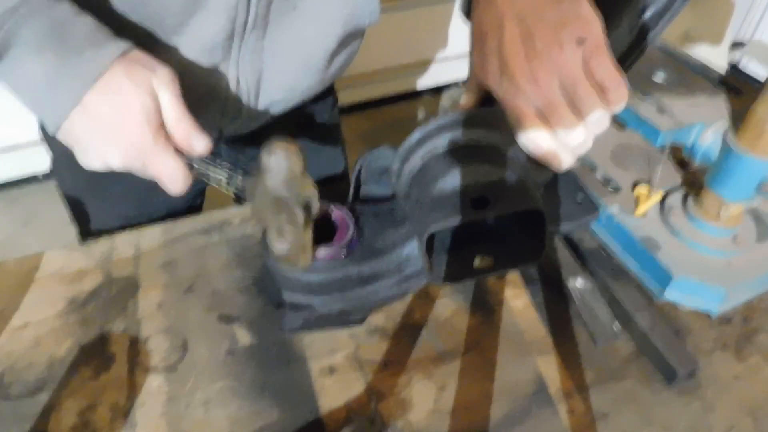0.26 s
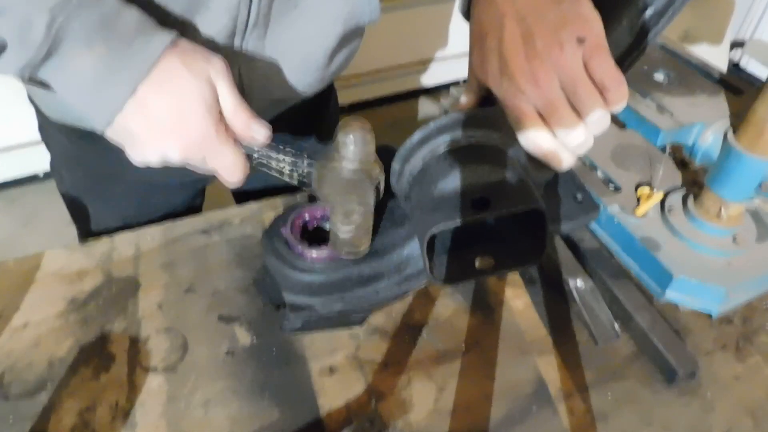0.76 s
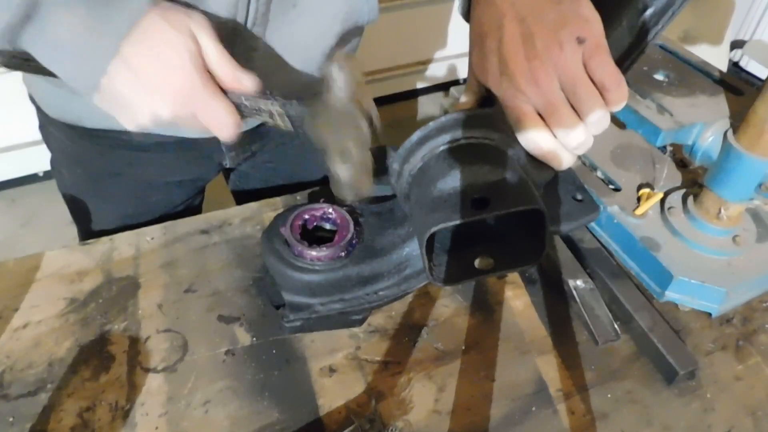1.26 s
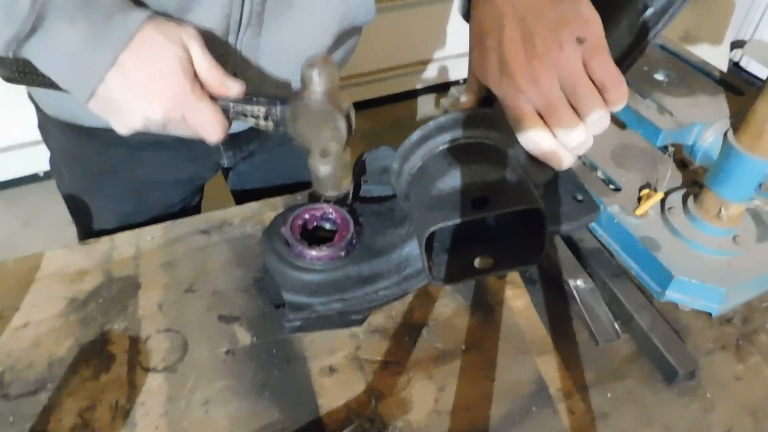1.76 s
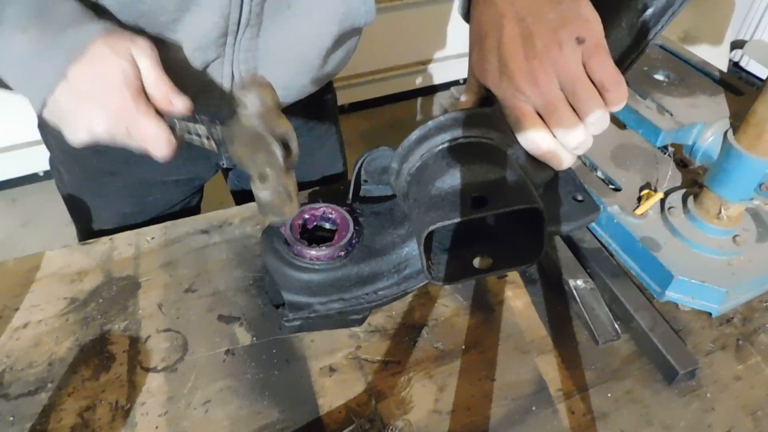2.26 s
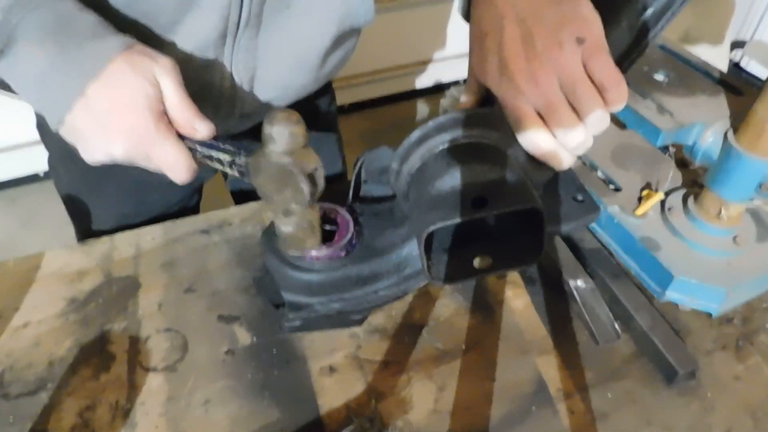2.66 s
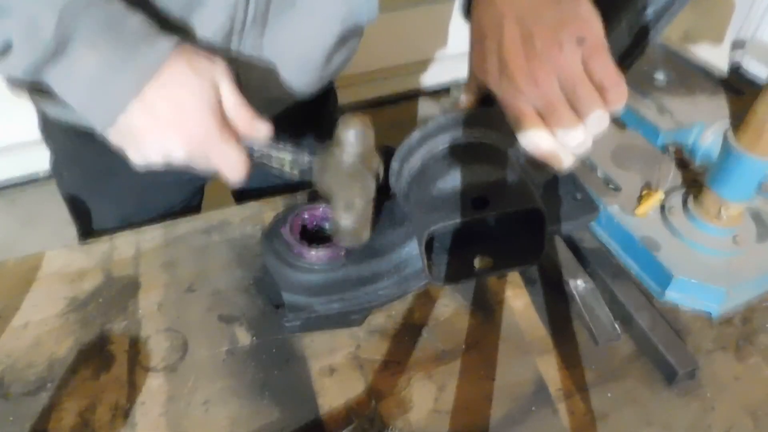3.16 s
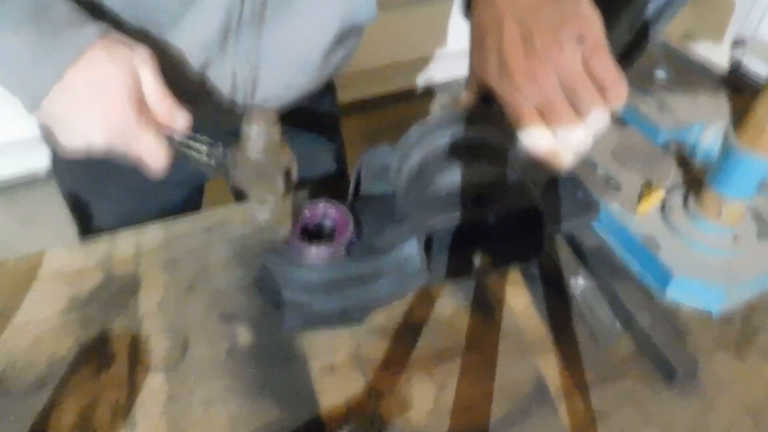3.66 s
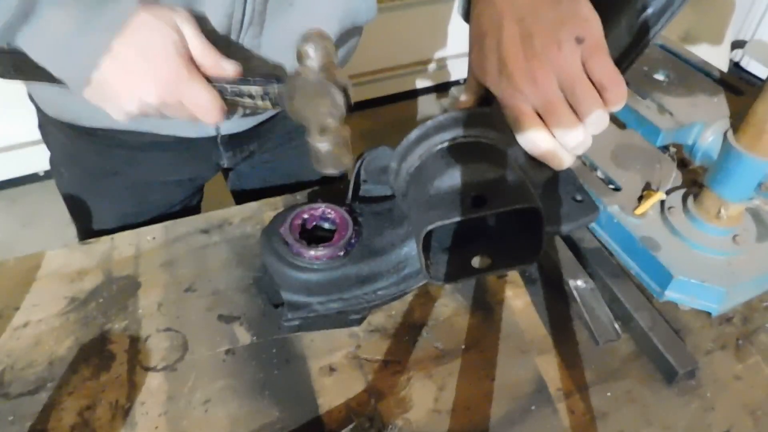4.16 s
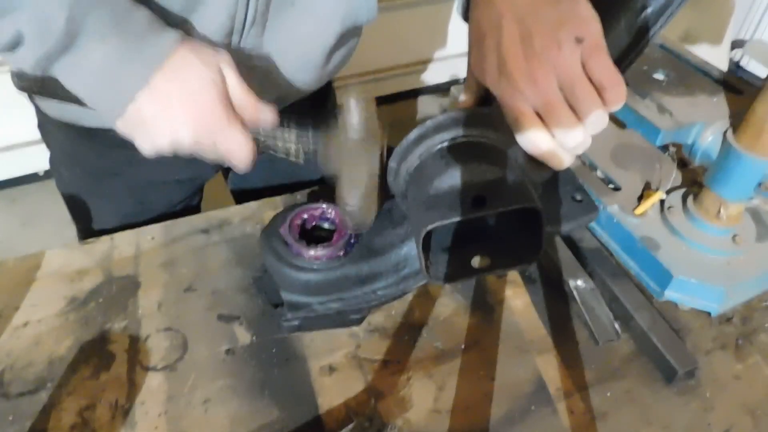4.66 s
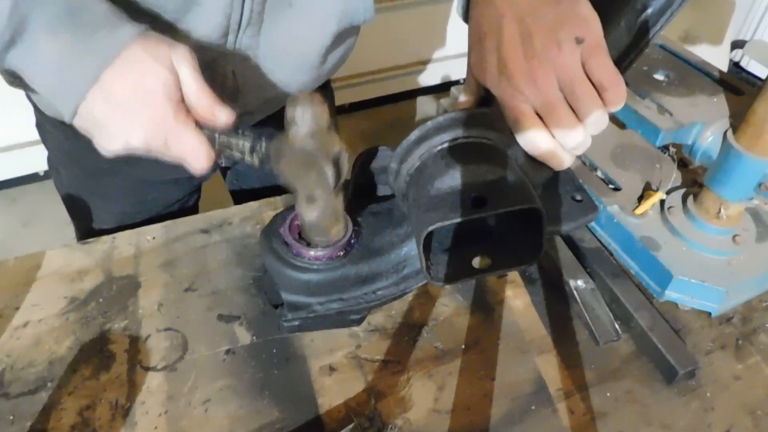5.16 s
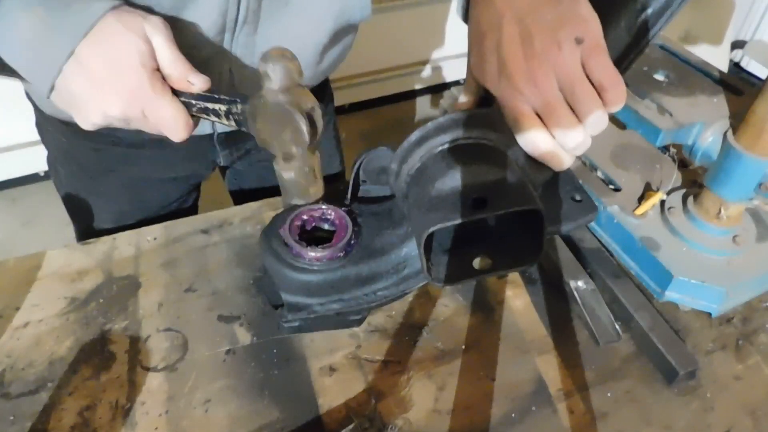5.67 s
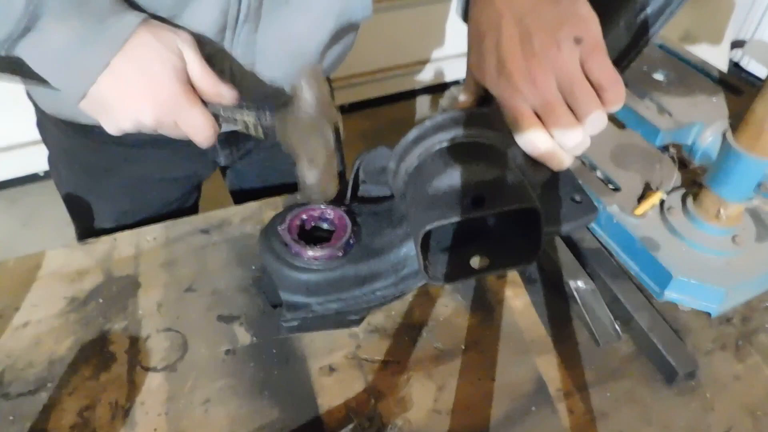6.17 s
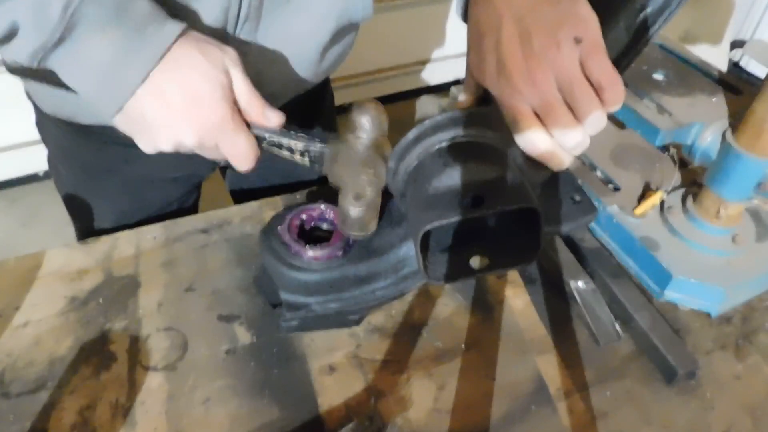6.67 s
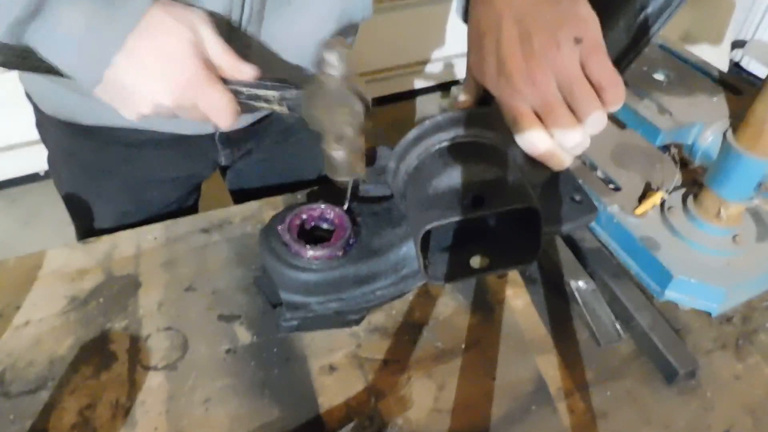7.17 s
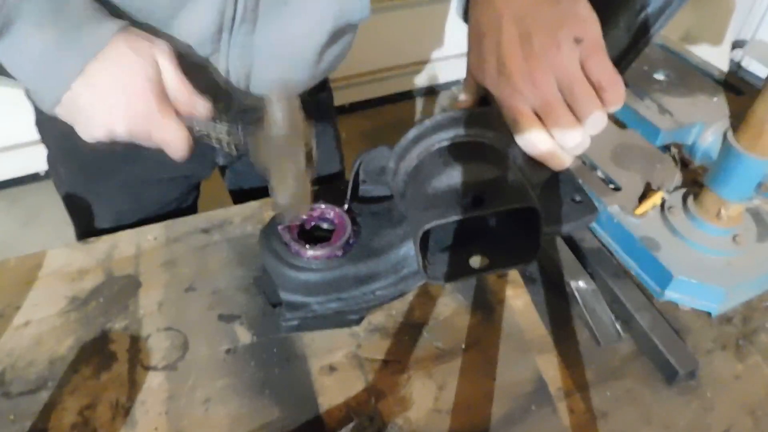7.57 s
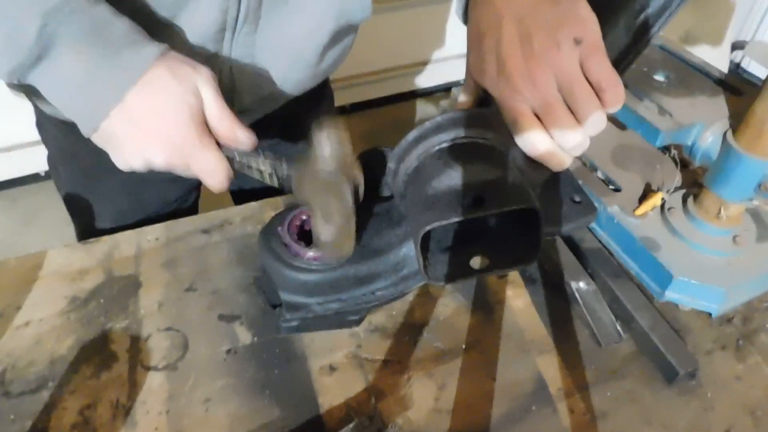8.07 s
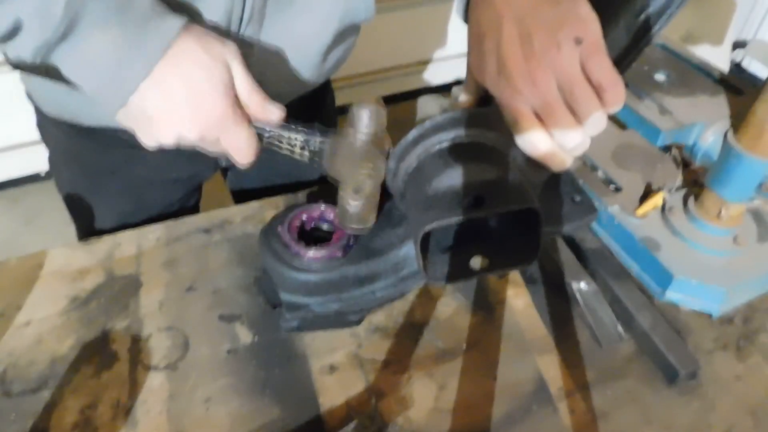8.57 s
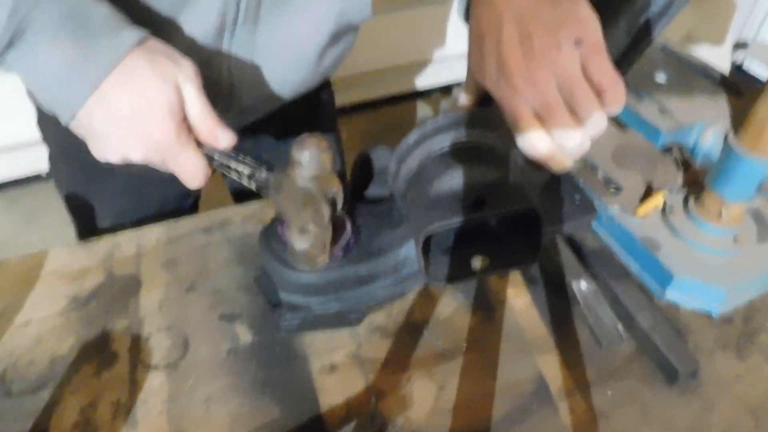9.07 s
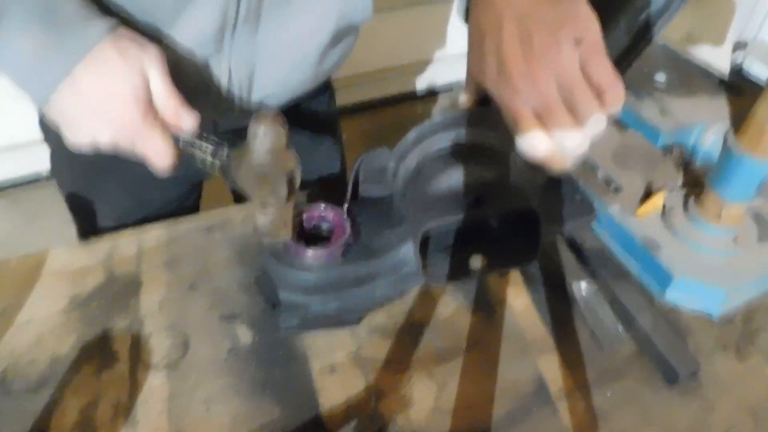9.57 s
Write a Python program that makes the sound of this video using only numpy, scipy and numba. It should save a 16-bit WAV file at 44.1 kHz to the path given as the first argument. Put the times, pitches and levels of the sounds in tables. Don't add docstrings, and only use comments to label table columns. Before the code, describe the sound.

A hammer taps a bearing into a clamped cast steel part, four or five hard blows a second in small groups with brief pauses. Early taps are duller, later ones crack sharper and firmer. Each rings the metal briefly, rattles the bench and leaves a short workshop echo. Close phone pickup, attacks slightly clipped, faint building hum.

```python
import sys
import numpy as np
from scipy import signal
from scipy.fft import rfft, irfft
from scipy.io import wavfile
from scipy.ndimage import uniform_filter1d
from numba import njit

SR = 44100
rng = np.random.default_rng(int(sys.argv[2]) if len(sys.argv) > 2 else 0)


def natural_amplitude(level_db):
    exponent = np.asarray(level_db, float) / 20
    return 10 ** exponent


def unload_audio(sound):
    columns = np.transpose(np.atleast_2d(sound))
    steps = np.round(np.clip(columns, -1, 1) * 32767)
    wavfile.write(sys.argv[1], SR, steps.astype(np.int16))


N = 433503
LEAD = SR // 2


# (time [s], place round
# the ring [steps], place across the ring [steps], long rings [dB])
HAMMER_TAPS = [(-0.17, -1, -0.61, 0.5), (0.282, -1, 0.16, 4), (0.509, -0.5, 0.53, -20.5),
               (0.7212, -0.1, 0.35, -8), (0.9309, 0.2, 0.92, -5), (1.124, 1.8, -0.66, -3),
               (1.6494, 0.45, -0.31, 2), (1.8665, -0.23, 0.26, 2.5), (2.361, -1.26, -0.9, 3),
               (2.5714, 0.7, -1.05, 2), (2.7732, -0.75, 0.11, -11.5), (3.0035, 0.1, 1, 3.5),
               (3.2058, 2.07, -0.24, 1), (3.6985, 0.1, -0.91, 8.5), (3.9429, -0.5, -0.7, 9),
               (4.3038, 0.9, -0.49, 6.5), (4.514, 1.4, -0.44, 5), (4.728, 1.5, 0.85, 7),
               (4.9523, 1.1, 0.65, 4.5),
               (5.2705, -0.25, 0.44, -3.5), (5.4877, -0.31, 0.036, -7), (5.808, -0.43, -0.47, -6.5),
                (6.026, 0.13, -1.46, 5), (6.2379, 1.16, -0.85, 6), (6.4272, 1.2, -1.4, 1),
                (6.6198, 1.95, -0.89, -10), (6.808, 2, -0.8, -8.5), (7.0104, 1.97, -1.04, 4.5),
                (7.4189, -0.1, -1.2, 3), (7.6289, 0.62, -1.2, 3.5), (7.933, -0.64, -0.23, -6),
                (8.13, 0.15, -0.68, 2.5), (8.3266, 1.7, -1.2, -3.5), (8.5214, 2.02, -1.26, 2),
                (8.8431, 0.73, 0.93, 6), (9.0432, -0.66, 0.54, 2), (9.3759, -0.29, -0.93, 2),
                (9.5704, -0.11, -1.25, 7.5), (9.778, 0.37, -1.4, 6.5)]


def taps():
    s, around, across, long_db = np.transpose(HAMMER_TAPS)

    loose_db = -9.5 * np.exp(-s / 4.3)
    reach_db = -0.72 * around ** 2 - 0.9 * across
    blow_db = 2.53 + loose_db + reach_db - 0.1 * long_db

    pause_s = 0.28
    fresh = np.diff(s, prepend=s[0]) > pause_s
    loose_crack_db = -9 * np.exp(-s / 2.44)
    edge_db = 0.84 * np.minimum(around ** 2, 4)
    crack_db = 3 + loose_crack_db + 2.1 * fresh + edge_db + 0.225 * long_db
    return np.transpose([s, blow_db, around, across, crack_db, long_db])


def lay(sounds):
    length = sounds.shape[-1]
    out = np.zeros((2, LEAD + N + length))
    for row, sound in zip(taps(), sounds):
        start = LEAD + int(row[0] * SR)
        out[:, start:start + length] += sound
    return out[:, :LEAD + N]


def colour(x, points):
    hz, db = np.transpose(points)
    bins = np.fft.rfftfreq(x.shape[-1], 1 / SR) + 1
    gain = natural_amplitude(np.interp(np.log(bins), np.log(hz), db))
    return irfft(rfft(x) * gain, x.shape[-1])


def level(x, db):
    return x * natural_amplitude(db) / np.sqrt(np.mean(x ** 2))


def fade(s, t60):
    return np.exp(-np.log(1000) * s / t60)


def ports(one, other, lag_s, apart, pan_db):
    bins = np.fft.rfftfreq(one.shape[-1], 1 / SR)
    late = irfft(rfft(one) * np.exp(-2j * np.pi * bins * lag_s), one.shape[-1])
    left = (late + apart * other) / np.hypot(1, apart)
    return np.stack([left * natural_amplitude(pan_db / 2), one * natural_amplitude(-pan_db / 2)], axis=1)


def ring(modes, blow_db, start, scatter_db, wobble, rise_s, lag_s, pan_db,
         back=0., back_s=.1, back_rise_s=0.0055):
    hz, db, t60, round_db, across_db = np.transpose(modes)
    around, across = np.clip(taps().T[2:4, :, None], -2.5, 2.5)

    s = np.arange(SR // 2) / SR
    rings = np.exp(2j * np.pi * hz[:, None] * s) * fade(s, t60[:, None])
    rings = rings * (1 - np.exp(-s / rise_s))
    rings = rings * (1 - back / (1 + np.exp((back_s - s) / back_rise_s)))

    chance = rng.standard_normal((len(taps()), 2, len(hz)))
    place_db = around * round_db + across * across_db
    gain = natural_amplitude(db + blow_db + place_db + scatter_db * chance[:, 0])
    gain = gain * np.exp(1j * (start + wobble * chance[:, 1]))

    left_gain = gain * np.exp(-2j * np.pi * hz * lag_s) * natural_amplitude(pan_db / 2)
    left = (left_gain @ rings).imag
    right = (gain @ rings).imag * natural_amplitude(-pan_db / 2)
    return lay(np.stack([left, right], axis=1))


# (frequency [Hz], level [dB], t60 [s], per step round
# [dB], per step across [dB])
CLAMPED_PART_MODES = [(109.4, -2, 0.051, 0, 1), (169, -2.5, 0.043, -0.6, 2.2), (301.7, -9, 0.1, 0, 2.5),
                      (489.5, -9.5, 0.13, 1, 3), (552.2, -4.5, 0.045, -7.5, 0.5), (657, 1.5, 0.032, 2, 1),
                      (772, 6.5, 0.034, -3, 0.5), (909, -5.5, 0.043, -5.5, 4), (1038, 1, 0.055, -5.5, 8),
                      (1087.2, 10, 0.053, -3, -2.5), (1301, -5, 0.036, -5, 4.5), (1793, -1, 0.045, 3, -0.5),
                      (1977, -5.5, 0.18, 2, -2.5),
                      (2164, 0, 0.068, -0.5, 2), (2283, -9.5, 0.07, 4.5, -3), (2349, -15, 0.2, -1.5, -6.5),
              (2453, -11.5, 0.18, 4, -1), (2794, 5, 0.054, 2, 3), (2916, -1, 0.043, 6, 3),
              (2940, -3, 0.051, 2.5, 8.5), (3056, -5, 0.053, -1, 7.5), (3190, -1.5, 0.054, 6.5, 7.5),
              (4056, -13, 0.059, 2.5, -3), (4370, -15.5, 0.028, 7.5, 0), (4450, -26, 0.04, 7, -4),
              (4780, -23.5, 0.042, 9, -6), (5100, -18.5, 0.01, 5.5, -4.5)]


def part_in_vice(part_db=-8):
    modes = CLAMPED_PART_MODES
    blow_db = taps()[:, 1:2]
    sides = np.pi * rng.integers(2, size=len(modes))
    return ring(modes, part_db + blow_db, sides, scatter_db=1.5, wobble=0.73,
                rise_s=0.0005, lag_s=4.5e-5, pan_db=1.8)


# (frequency [Hz], level [dB], t60 [s], per step round [dB], per step across [dB])
LOW_PAIR_MODES = [
    (420.2, -13, 0.45, -0.5, 2),
    (400, -24.5, 0.053, -2.5, 1.5),
]
HIGH_PAIR_MODES = [
    (1410, -9.5, 0.41, -0.37, -2),
    (1381, -5, 0.18, -1.1, -1),
]


def long_rings(low_db=-6, low_share=.55, high_db=-8):
    blow_db, long_db = taps()[:, 1:2], taps()[:, 5:6]
    low = ring(LOW_PAIR_MODES, low_db + blow_db + low_share * long_db, 0, scatter_db=2.4, wobble=.1,
               rise_s=0.017, lag_s=4.5e-5, pan_db=1.0, back=3.5, back_s=0.11)
    high = ring(HIGH_PAIR_MODES, high_db + blow_db + long_db, 0, scatter_db=2.4, wobble=0.077,
                rise_s=0.0031, lag_s=4.5e-5, pan_db=3.5, back=3.83, back_s=0.1, back_rise_s=0.0071)
    return low + high


# (frequency [Hz], level [dB], t60 [s], per step round [dB], per step across [dB])
HEAD_MODES = [(3645, 2.5, 0.025, -1.5, 4), (5564, -1.5, 0.012, 4, -4), (6360, 0, 0.034, -2, 5.5),
              (7350, -15, 0.023, 0, -2.5), (7830, -8.5, 0.038, -5.5, -3), (8570, -0.5, 0.02, 2.5, -1),
              (11020, -10, 0.054, 3, -3), (10890, 3.5, 0.017, -16, 3), (11800, 1, 0.018, 3, 17),
              (12160, -3, .02, -4, -3)]


def hammer_head(head_db=-24):
    crack_db = taps()[:, 4:5]
    return ring(HEAD_MODES, head_db + crack_db, 0, scatter_db=3.5, wobble=2.34,
                rise_s=0.00023, lag_s=2e-5, pan_db=-0.5)


# (frequency [Hz], level per Hz [dB])
CRACK_COLOUR = [(180, -10.5), (300, -3), (1220, 2), (1810, -8.5), (2880, -7.5), (3400, -14), (4650, -15.5),
                (5130, -19), (6360, -17), (8420, -15), (8990, -17), (12300, -14.5), (15500, -19)]


def crack(crack_db=0, t60=0.015, rise_s=0.00053, lag_s=2.6e-5, apart=1.0, pan_db=-3.8, spread_db=-2):
    s = np.arange(SR // 20) / SR
    noise = colour(rng.standard_normal((len(taps()), 2, len(s))), CRACK_COLOUR)
    scale = 1 / noise.std()
    shape = fade(s, t60) * (1 - np.exp(-s / rise_s))
    gain = scale * natural_amplitude(crack_db + taps()[:, 4])[:, None, None]
    burst = ports(noise[:, 0], noise[:, 1], lag_s, apart, pan_db) * shape

    impulse = 1. * (np.arange(len(s)) == SR // 1000)
    click = colour(impulse, CRACK_COLOUR) * (s < .02)
    click = click * natural_amplitude(spread_db) * np.linalg.norm(shape)
    click = click * np.ones((len(taps()), 2, 1))
    return lay(burst * gain), lay(click * gain)


# (frequency [Hz], level per Hz [dB])
BENCH_COLOUR = [(45, -45.5), (80, -4), (164, -14.5), (222, -11), (294, -6), (480, -9), (1310, -11.5),
                (1410, -2.5), (1660, -6.5), (3190, -20), (3580, -28), (11500, -43), (16000, -59)]


def bench(bench_db=-11, t60=0.15, rise_s=0.0015, lag_s=4e-5, apart=0.4, pan_db=7.5):
    s = np.arange(SR // 4) / SR
    noise = level(colour(rng.standard_normal((len(taps()), 2, len(s))), BENCH_COLOUR), 0)
    shape = fade(s, t60) * (1 - np.exp(-s / rise_s))
    gain = natural_amplitude(bench_db + taps()[:, 1])[:, None, None]
    return lay(ports(noise[:, 0], noise[:, 1], lag_s, apart, pan_db) * shape * gain)


# (frequency [Hz], t60 [s], level [dB], likeness left-right [0-1], left minus right [dB])
ROOM_BANDS = [(50, 0.74, -4, 0.9, -6), (105, 0.42, -2.5, 0.97, 1.5), (230, 0.4, 4, 1, 2),
              (490, 0.43, 9, 0.96, 2), (770, 0.47, -1.5, 0.81, 0), (980, 0.46, 4.5, 0.63, 2),
              (1540, 0.63, -1.5, 0.43, 2), (2210, 0.43, -0.5, 0.42, -0.5), (2800, 0.44, -1, 0.08, 2),
              (4180, 0.43, 1.5, 0, 0.5), (7900, 0.37, -1.5, 0, -0.5), (15100, 0.24, -4.5, 0, 2)]


def workshop(dry, wet_db=-8, first_s=0.0042, build_s=0.0018, wall_db=1.5, wall_s=0.1395, wall_spread_s=0.022):
    s = np.arange(SR) / SR
    bins = np.log(np.fft.rfftfreq(SR, 1 / SR) + 1)
    centres = np.log(np.array(ROOM_BANDS)[:, 0])
    noise = rfft(rng.standard_normal((2, SR)))
    echo = 0
    for k, (hz, t60, db, like, pan_db) in enumerate(ROOM_BANDS):
        band = np.interp(bins, centres, np.arange(len(ROOM_BANDS)) == k)
        mid, side = irfft(noise * band, SR) * fade(s, t60) / np.sqrt(t60 * SR / 20)
        mid, side = mid * np.sqrt(1 + like), side * np.sqrt(1 - like)
        left, right = (mid + side) * natural_amplitude(pan_db / 2), (mid - side) * natural_amplitude(-pan_db / 2)
        echo = echo + natural_amplitude(db) * np.array([left, right])
    echo = echo * (1 - np.exp(-np.maximum(s - first_s, 0) / build_s))
    echo = echo * natural_amplitude(wall_db * np.exp(-((s - wall_s) / wall_spread_s) ** 2))
    power = np.abs(rfft(echo)) ** 2
    even = np.sqrt(uniform_filter1d(power, size=250) / uniform_filter1d(power, size=20))
    echo = irfft(rfft(echo) * even, SR) * (s < .8)
    mono = dry.mean(axis=0)[None]
    return natural_amplitude(wet_db) * signal.fftconvolve(mono, echo, axes=1)[:, :dry.shape[1]]


# (frequency [Hz], level in the room [dB])
BEAMING_MODES = [(300, 0), (380, 0), (415, -4), (460, 0), (950, 0), (1090, -9), (1180, 0), (1330, 0),
                 (1405, -6), (1480, 0), (2600, 0), (2780, -5), (3000, 0), (4100, -6), (4400, 0)]


def walls(body, near, around, pairs, head):
    patchy, pair_share, head_share = .3, .12, .3
    spread = colour(body, BEAMING_MODES) + around
    return workshop(spread + patchy * near + pair_share * pairs + head_share * head)


# (frequency [Hz], level per Hz [dB])
AIR_COLOUR = [(15, -6), (35, 0), (70, -12), (300, -18), (1000, -24), (3000, -34), (8000, -46), (16000, -54)]


def air(air_db=-62, apart=0.17):
    mid, side = colour(rng.standard_normal((2, N)), AIR_COLOUR)
    return level(np.array([mid + apart * side, mid - apart * side]), air_db)


def scene():
    head, pairs = hammer_head(), long_rings()
    body = part_in_vice() + bench()
    near, around = crack()
    echo = walls(body, near, around, pairs, head)
    return (body + head + pairs + near + echo)[:, LEAD:] + air()


@njit
def follow(x, attack, release):
    y = np.empty(len(x))
    e = x[:400].mean()
    for i in range(len(x)):
        e += (x[i] - e) * (attack if x[i] > e else release)
        y[i] = e
    return y


def band_limit(x):
    return signal.sosfilt(signal.butter(12, 16800, fs=SR, output="sos"), x)


def record(dry, boost_db=12, top_db=-28, ratio=1.803, attack_s=0.0038, release_s=0.058, drive=1.22, full=0.92):
    top_hz = 15700
    top_cut = signal.ellip(10, .3, 60, top_hz, fs=SR, output="sos")
    loud = natural_amplitude(boost_db) * signal.sosfilt(top_cut, dry)

    envelope = follow(np.abs(loud).mean(axis=0), 1 / (attack_s * SR), 1 / (release_s * SR))
    gain = np.minimum(natural_amplitude(top_db) / (envelope + 1e-9), 1) ** (1 - 1 / ratio)
    held = drive * loud * gain

    clipped = full * held / (1 + held ** 4) ** (1 / 4)
    clip_cut = signal.ellip(8, .3, 50, 1.05 * top_hz, fs=SR, output="sos")
    clipped = signal.sosfilt(clip_cut, clipped)
    return band_limit(clipped)


dry = scene()
out = record(dry)
unload_audio(out)
```